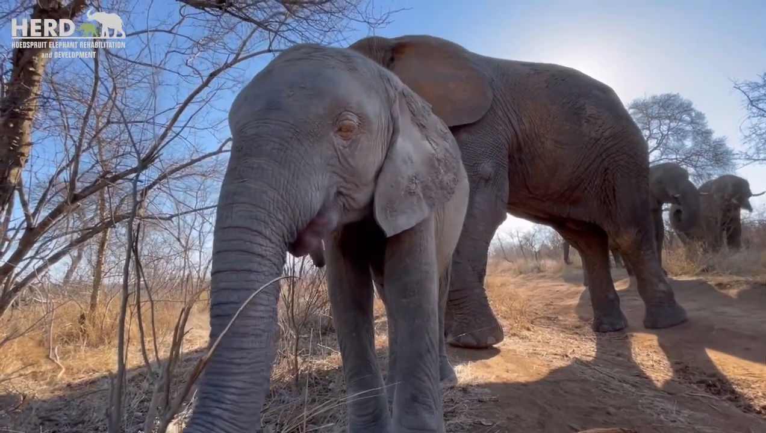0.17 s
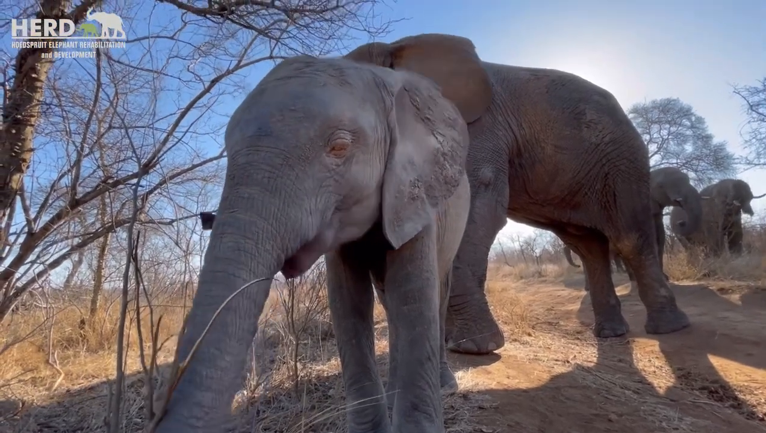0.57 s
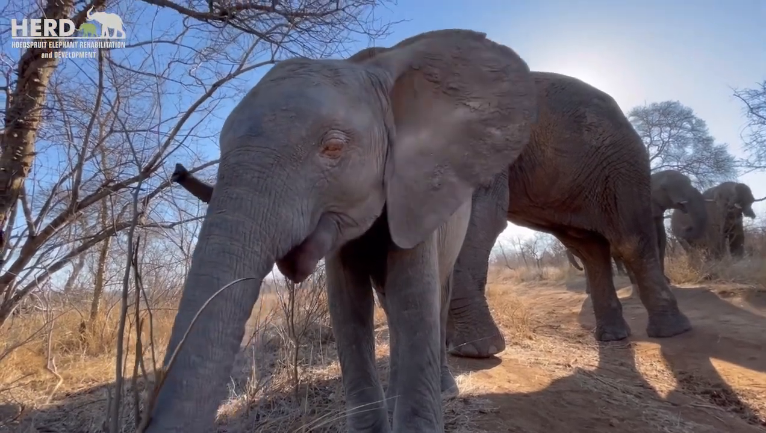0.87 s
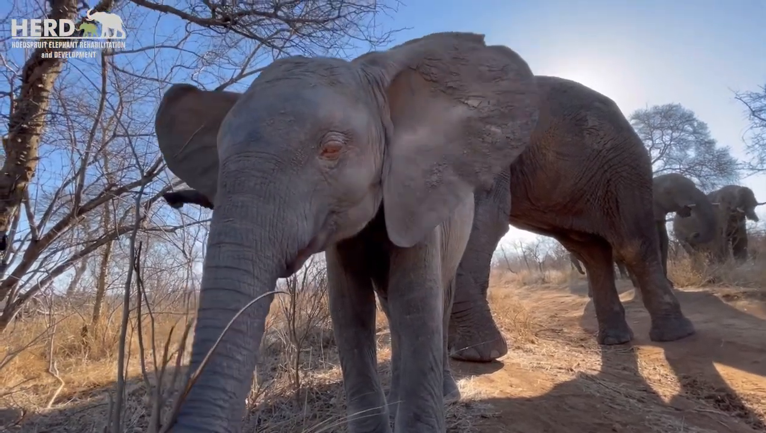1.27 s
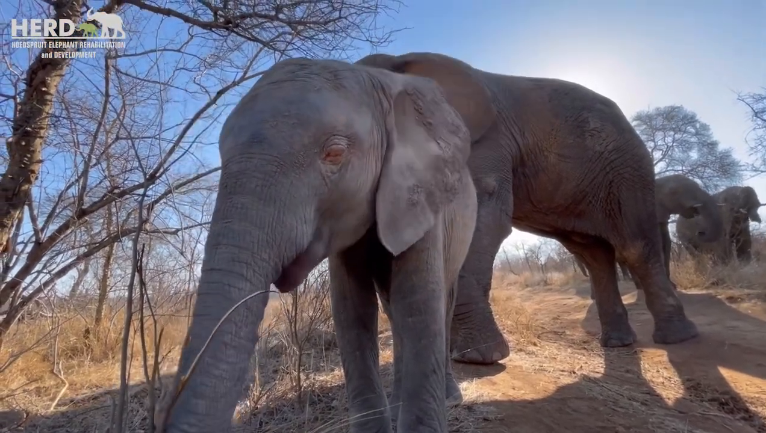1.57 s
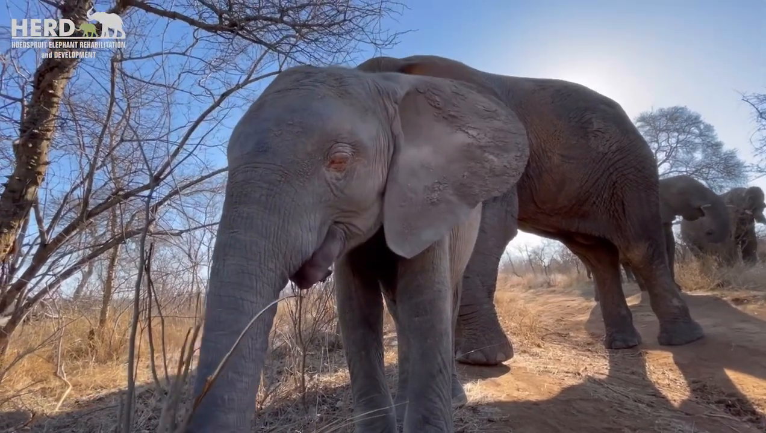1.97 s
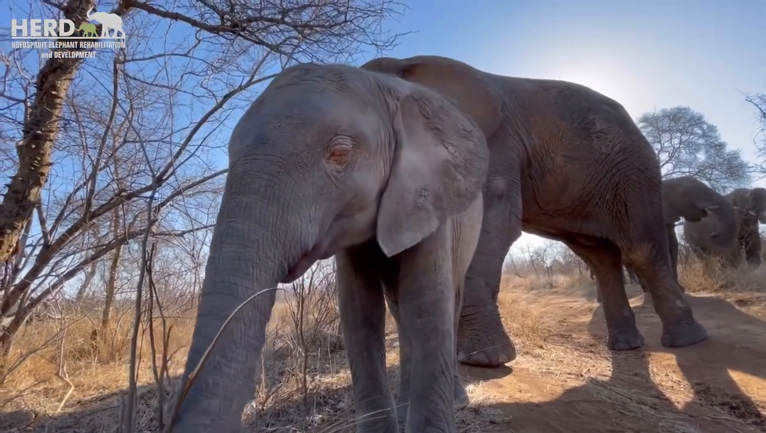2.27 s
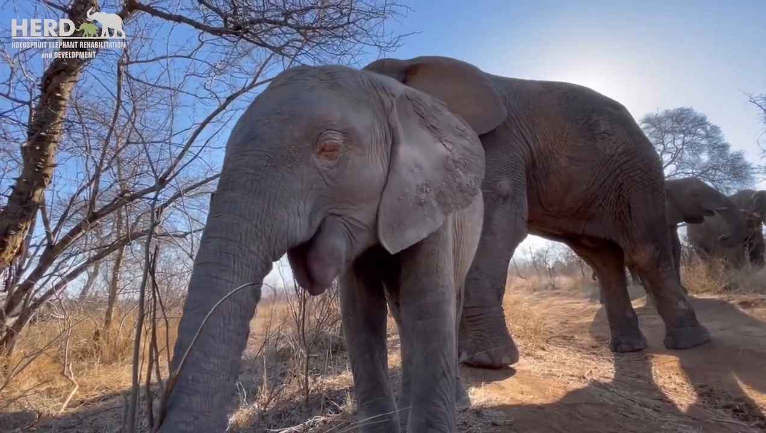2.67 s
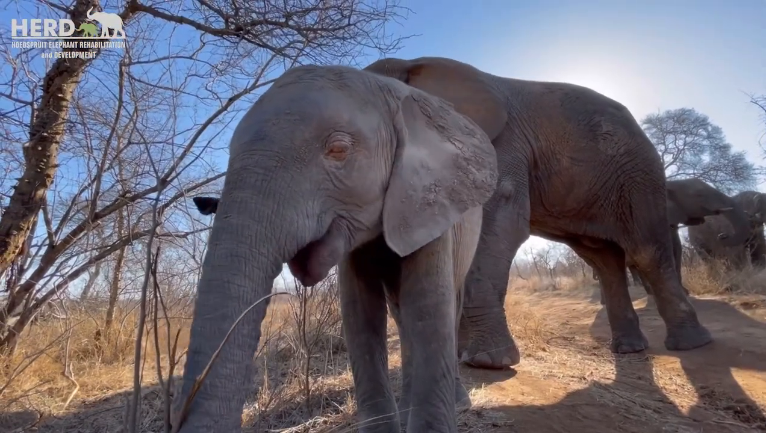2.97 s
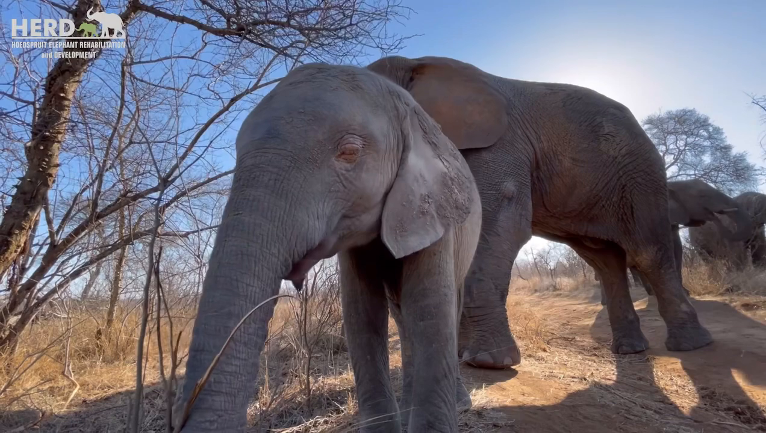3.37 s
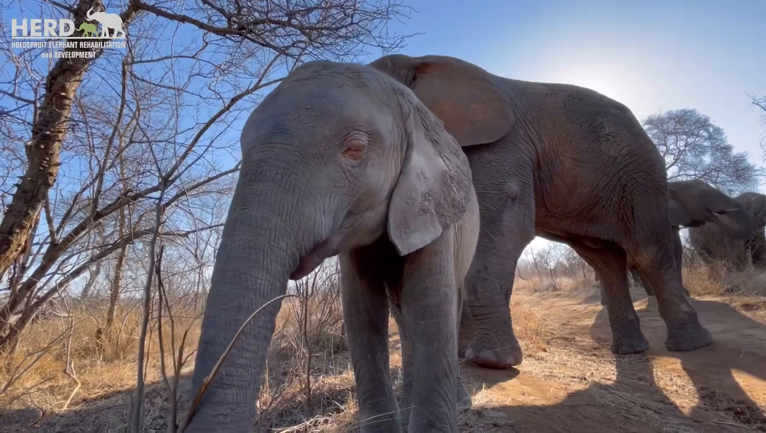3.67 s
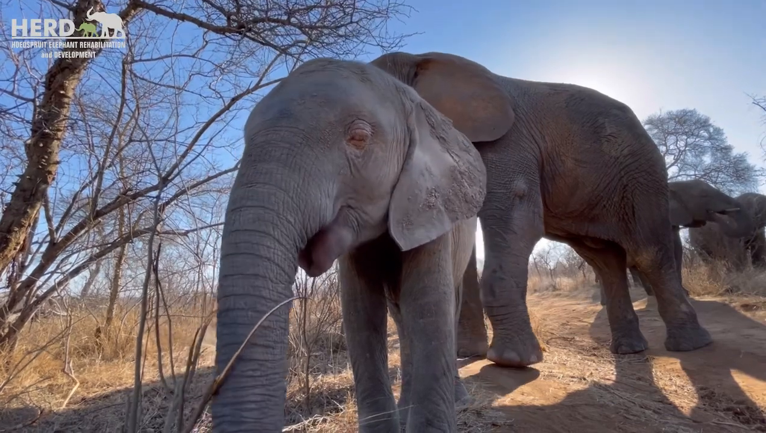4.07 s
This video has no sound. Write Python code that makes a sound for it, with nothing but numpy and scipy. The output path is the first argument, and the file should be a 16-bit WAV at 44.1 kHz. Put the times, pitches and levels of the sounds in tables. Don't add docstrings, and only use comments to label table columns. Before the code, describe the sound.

Close, dry outdoor stereo sound of a young elephant in brittle bush. At the start there are dull wooden scrapes, a soft low thud and hissing grass, with twigs snapping until about 0.75 s. From 0.35 to 1.6 s a quiet, very deep rumble throbs about twenty times a second, slightly left, its faint mouth ring closing into a muffled nasal hum. Light rustling and a few ticks fill the gap, with soft thuds around 1.4 to 1.75 s. At 1.85 to 2.0 s grass swishes hard with a loud sharp crack. A much louder hoarse roar bursts in at 2.15 s, breathy and ragged, then clearer and rattling in rapid pulses, sagging in pitch until about 3.15 s; a low chest hum lingers briefly. After a thud near 3.2 s, dense crackles, snaps and bright clicks run from 3.5 to 3.95 s, with low wind buffets, then thin out.

```python
import sys
import numpy as np
from scipy import signal
from scipy.fft import rfft, irfft, next_fast_len
from scipy.io import wavfile
from scipy.ndimage import uniform_filter1d

SR = 44100
rng = np.random.default_rng(int(sys.argv[2]) if len(sys.argv) > 2 else 0)


def output_pcm(signal):
    pcm = np.clip(np.atleast_2d(signal).T, -1, 1) * 32767
    wavfile.write(sys.argv[1], SR, np.round(pcm).astype(np.int16))


def amplitude_ratio(level_db):
    exponent = np.asarray(level_db, float) / 20
    return 10 ** exponent


N = 185264

# (frequency [Hz], level [dB])
GRASS_COLOUR = [(250, -14), (1200, -3.5), (2000, -0.5), (2800, -1.5), (4900, 0), (5600, -0.5), (6300, 2),
                (7000, 0.5), (7500, -7), (8300, 1.5), (9700, -4), (11000, -3.5), (12500, -12),
                (14800, -3.5)]


def evened(x):
    return x / np.sqrt(np.mean(abs(x) ** 2) + 1e-20)


def read(points, hz, size=1):
    rows = np.transpose(points)
    return np.interp(np.log(hz + 1), np.log(rows[0] + 1), rows[size])


def curves(rows, t):
    s, *columns = np.transpose(rows)
    return [np.interp(t, s, c) for c in columns]


def add(mix, s, sound):
    part = mix[..., round(s * SR):][..., :sound.shape[-1]]
    part += sound[..., :part.shape[-1]]


def butter_pass(x, order, hz, kind="low"):
    return signal.lfilter(*signal.butter(order, hz, kind, fs=SR), x)


def slow_noise(size):
    return evened(uniform_filter1d(rng.standard_normal(N), size=size))


def resonate(x, hz, width):
    turn = np.exp(2j * np.pi * np.cumsum(hz * np.ones(len(x))) / SR)
    r = np.exp(-np.pi * width / SR)
    return 2 * (turn * signal.lfilter([1 - r], [1, -r], x / turn + 1e-18)).real


def two_cavities(x, hz, width, next_hz, next_width):
    return resonate(resonate(x, hz, width), next_hz, next_width)


def folds(rate, snap_s):
    turns = np.cumsum(curves(rate, np.arange(N) / SR)[0]) / SR
    return turns - turns[round(snap_s * SR)]


def closures(turns, wobble_db):
    return (np.diff(np.floor(turns), prepend=0) == 1) * amplitude_ratio(wobble_db * rng.standard_normal(N))


def partials(turns, orders, lag, bend):
    return sum((-1) ** (k == 4) * amplitude_ratio(db) * np.cos(2 * np.pi * (k * (turns - lag) + bend))
               for k, db in orders)


def swells(rows, t):
    powers = []
    for s, db, rise, fall, *_ in rows:
        climb = (s - t) / (abs(rise) + 0.0097)
        drop = (t - s) / (abs(fall) + 0.0027)
        powers.append(amplitude_ratio(2 * db - 20 * np.maximum(climb, drop)))
    return np.array(powers)


def over(bed_db, rows, t):
    return 10 * np.log10(amplitude_ratio(2 * bed_db) + swells(rows, t).sum(axis=0))


def ports(pair, gain=1, focus=0):
    # (frequency [Hz], likeness [0-1], left leads by [rad], left over right [dB])
    port_table = [(60, .95, 0, 1.5), (300, .85, .1, 1), (700, .5, .5, 3), (1400, .55, 1.2, 2),
                  (2300, .88, 3.1, -2), (3500, .65, 5.3, 1), (5300, .6, 8.8, 2.5), (5800, .4, 10.5, 1),
                  (6700, .7, 11.5, 1), (7500, .4, 14.5, 0), (8500, .5, 13.4, -1.5), (10700, .92, 15.7, -1),
                  (11600, .6, 14.6, 0), (12100, .94, 12.6, 0)]
    hz, t, (a, b) = signal.stft(pair, SR, nperseg=256, noverlap=192)
    same, lead, tilt_db = (read(port_table, hz, size=k)[:, None] for k in (1, 2, 3))
    same = np.clip(same + focus * (1 - same), 0, 1)
    left = a * amplitude_ratio(tilt_db / 2)
    right = (same * a + np.sqrt(1 - same ** 2) * b) * np.exp(-1j * lead) / amplitude_ratio(tilt_db / 2)
    z = np.array([left, right]) * (gain(hz[:, None], t) if callable(gain) else gain)
    return signal.istft(z, SR, nperseg=256, noverlap=192)[1][:, :N]


def shaped(colour, same):
    size = next_fast_len(N)
    a, b = rfft(rng.standard_normal((2, size)))
    z = np.array([a, same * a + np.sqrt(max(1 - same ** 2, 0)) * b])
    return evened(irfft(z * amplitude_ratio(read(colour, np.fft.rfftfreq(size, 1 / SR))), size)[:, :N])


def rumble():
    # (time [s], rate [Hz])
    fold_rate = [(.35, 20.0), (.75, 20.0), (.85, 19.6), (1.1, 19.6), (1.3, 19.2), (1.56, 18.9)]
    # (time [s], effort [dB], mouth opening [0-1])
    effort = [
        (.33, -48, 0.9),
        (.4, -47, 0.95),
        (.58, -45, 1),
        (.66, -41.5, 0.58),
        (.75, -43.5, 0.01),
        (1.2, -43, 0.39),
        (1.48, -45.5, 0.45),
        (1.54, -51, 0.07),
        (1.6, -75, 0.3),
    ]
    # (multiple, level [dB])
    orders = [(1, -36), (2, 6.5), (3, -3), (4, -3.5), (5, -13), (6, -3.5), (7, -22), (8, -2), (9, -30),
              (10, -7), (11, -34), (12, -8), (13, -27), (14, -15)]
    t, turns = np.arange(N) / SR, folds(fold_rate, .4015)
    deep_db, gape = curves(effort, t)
    chest_db = deep_db - 1 + 2 * gape
    throat_db = deep_db - 3 - 4.5 * gape
    odd_db = 2 + 16.5 * gape
    mouth_db = -89 + 31 * np.clip(gape / 0.37, 0, 1)
    mouth_hz = np.interp(t, [.4, .68, 1.02, 1.25, 1.5], [960, 960, 910, 994, 977])
    mouth_hz = mouth_hz * (0.982 + 0.14 * (turns % 1))

    deep, chest = (evened(partials(turns, k, .13, -.14)) for k in (orders[1:2], orders[2:4]))
    odd, even = (partials(turns, k, .115, .16) for k in (orders[4::2], orders[5::2]))
    throat = (even + amplitude_ratio(odd_db) * odd) / np.std(even)

    beat = closures(turns, 1.6) + 0.24 * closures(turns - .2, 7.2)
    beat = beat + 0.0078 * rng.standard_normal(N)
    beat = beat + np.exp(-((t - 0.65) / 0.045) ** 2) * closures(turns - .52, 3.2)
    ring = evened(two_cavities(beat, mouth_hz, 75, mouth_hz, 260))
    ring += 0.29 * evened(two_cavities(beat, 725, 150, 750, 200))
    ring += 0.13 * evened(two_cavities(beat, 1280, 160, 1270, 240))

    whine = evened(two_cavities(rng.standard_normal(N), 1145, 30, 1145, 60))
    whine = whine * amplitude_ratio(-67.5 - 7.6 * ((t - .95) / 0.21) ** 4)
    nose_hz = 435 - 60 * (t - .6)
    breath = 0.026 * rng.standard_normal(N) + beat + np.roll(beat, round(0.018 * SR))
    nose = evened(two_cavities(breath, nose_hz, 100, nose_hz, 125))
    nose += 0.53 * evened(two_cavities(beat + closures(turns - .5, 2.0), 317, 90, 320, 120))
    nose = butter_pass(nose, 4, 490)

    voice = whine + amplitude_ratio(deep_db) * deep + amplitude_ratio(chest_db) * chest
    voice = voice + amplitude_ratio(throat_db) * (throat + amplitude_ratio(-12.5) * nose) + amplitude_ratio(mouth_db) * ring
    return voice * np.clip(np.minimum(t - effort[0][0], effort[-1][0] - t) / 0.045, 0, 1)


def roar():
    # (time [s], rate [Hz])
    fold_rate = [(2.2, 31.5), (2.28, 30.27), (2.45, 30.26), (2.6, 29.28), (2.75, 28.35), (2.9, 28.41),
                 (3.05, 27.27), (3.2, 23.37)]
    # (time [s], effort [dB], mouth resonance [Hz], hoarse share [0-1])
    effort = [
        (2.154, -36, 960, 1.1),
        (2.21, -34.5, 1153, 1.24),
        (2.33, -35, 975, 0.96),
        (2.41, -33, 914, 0.63),
        (2.6, -34.5, 870, 0.53),
        (2.85, -36.5, 856, 0.52),
        (2.93, -33.5, 945, 0.43),
        (3.04, -37.5, 900, 0.48),
        (3.137, -35, 972, 0.62),
    ]
    # (time [s], peak [dB], frequency [Hz], t60 [s])
    coughs = [(2.1533, -17.5, 1050, 0.015), (2.156, -15.5, 917, 0.034), (2.165, -18, 1070, 0.058),
              (2.247, -26, 1020, 0.006), (2.249, -26, 1140, 0.022), (2.259, -31, 1033, 0.069),
              (2.292, -14, 1150, 0.013), (2.322, -14.5, 1450, 0.01)]
    t, turns = np.arange(N) / SR, folds(fold_rate, 2.376)
    effort_db, mouth_hz, hoarse = curves(effort, t)
    start, end = effort[0][0], effort[-1][0]
    burst = np.exp(-((t - 2.168) / 0.039) ** 2)
    spent = np.maximum(t - end, 0) / 0.07
    mouth_hz = mouth_hz * (1 + 0.079 * hoarse ** 3 * slow_noise(500))
    hoarse, cycle = np.clip(hoarse + .5 * spent, 0, 1), turns % 1
    throat_db = -2 - 8.5 * hoarse + 1.5 * burst
    attack_db = -30 * np.clip((start - t) / 0.0025, 0, 10)
    effort_db = effort_db + 8 * burst - 30 * np.minimum(spent, 2) ** 3 + attack_db

    beat = closures(turns, 1.1) * (turns > -1.5)
    rattle = .45 * closures(turns - .31, 2.5) + .2 * closures(turns - .56, 3.5)
    rattle = butter_pass(rattle, 3, 1700)
    clumps = amplitude_ratio(2.6 * slow_noise(150))
    airflow = np.clip(1 - 0.68 * (1 - hoarse ** 2) * np.exp(-(cycle / 0.2) ** 2), .1, 1)
    puffs = airflow * clumps * rng.standard_normal(N)
    clear = 0.8 * evened(beat + 0.16 * closures(turns - .31, 4.2))
    drive = np.sqrt(1 - hoarse ** 2) * clear + hoarse * evened(puffs)
    soft = butter_pass(drive, 4, 1150)

    mouth = resonate(soft, mouth_hz, 88) + 0.37 * hoarse * resonate(soft, 0.75 * mouth_hz, 330)
    mouth = resonate(mouth, mouth_hz, 720)
    upper_hz = mouth_hz * (1.22 + 0.2 * cycle)
    upper = two_cavities(3.1 * evened(puffs) + evened(rattle), upper_hz, 500, upper_hz, 1400)
    throat = two_cavities(soft, 442, 150, 398, 213) + 0.84 * two_cavities(soft, 643, 300, 514, 480)
    edge = two_cavities(puffs, 1800, 260, 2230, 220)
    hiss = resonate(puffs + 0.8 * rng.standard_normal(N), 8000, 990)
    hiss = signal.sosfilt(signal.butter(6, [7850, 9300], "band", fs=SR, output="sos"), hiss)
    voice = evened(mouth) + amplitude_ratio(-8.5) * evened(upper) + amplitude_ratio(throat_db) * evened(throat)
    voice = voice + amplitude_ratio(-27.0) * evened(edge) + amplitude_ratio(-25.5) * evened(hiss)
    voice *= amplitude_ratio(effort_db - 2.0)

    ring = np.arange(2000) / SR
    for s, db, hz, t60 in coughs:
        decay = amplitude_ratio(db - 60 * ring / t60) * (1 - np.exp(-ring / 0.00035))
        add(voice, s, decay * 0.73 * np.sin(2 * np.pi * hz * ring))
    return voice + chest_hum(t, turns, spent)


def chest_hum(t, turns, spent):
    # (time [s], rate [Hz])
    hum_rate = [(2.2, 33.5), (2.35, 32.5), (2.47, 30.2), (2.6, 29.28), (2.75, 28.35), (2.9, 28.41),
                (3.05, 27.27), (3.3, 26.5)]
    # (multiple, level [dB])
    orders = [(1, -19), (2, 3), (3, -7.5), (4, 1.5), (5, -6), (6, -29.5), (7, -15)]
    start_s, end_s, swell_s, lock_s = 2.204, 3.36, 0.19, 2.7
    hum_turns = folds(hum_rate, lock_s) + turns[round(lock_s * SR)]
    chest = partials(hum_turns, orders[1:], 0, .06)
    span = np.clip(np.minimum(t - start_s, end_s - t) / 0.041, 0, 1)
    since = (t - start_s) / swell_s
    sag_db = 4.5 * swell_s * (since - 1)
    hum_db = np.minimum(-55 + 8.5 * since, -46.5 - sag_db)
    return amplitude_ratio(hum_db - 5 * np.minimum(spent, 1)) * evened(chest) * span


def scrub(x):
    t = np.arange(round(.3 * SR)) / SR
    sparse = rng.standard_normal((2, len(t))) * (rng.random((2, len(t))) < .05)
    taps = sparse * amplitude_ratio(-60 * t / 0.44) * (t > .006)
    return signal.fftconvolve(x[None], taps / np.linalg.norm(taps[0]), axes=1)[:, :N]


def rustle():
    # (peak time [s], level [dB], rise by 10 dB [s], fall by 10 dB [s], brightness [dB])
    strokes = [(.001, -54.5, .1, -0.3, -1.5), (.08, -62, 3, 0.2, -1), (.2, -61.5, -4, 0.15, 7),
               (.31, -54, -0.06, 0.2, 0.5), (.4, -54.5, 0.16, 0.11, 1), (.49, -58.5, -0.2, 0.25, 0),
               (.6, -59.5, -0.5, 0.25, -6), (.73, -54, 0.33, 0.12, 1.5), (.94, -58.5, .05, 0.16, 5),
               (1.3, -61, 0.6, -0.3, 2), (1.47, -53, 0.07, 0.25, 1), (1.68, -61.5, 0.7, .06, -1.5),
               (1.82, -56.5, 0.25, .05, 1), (1.885, -43.5, 0.027, 0.06, 1.5),
               (1.938, -38, 0.0248, 0.02, 4.5), (1.996, -42.5, .04, 0.0463, -2.5), (2.05, -60, -0.4, 1, 1),
               (2.19, -48, 0.08, 0.32, -5.5), (2.255, -43.5, 0.01, 0.09, -7.5),
               (2.41, -46.5, 0.07, 0.08, -2), (2.445, -49.5, 0.01, 0.05, -13), (2.51, -59, -0.1, 0.2, 0),
               (2.678, -57.5, -0.4, 0.24, 1), (2.79, -62, -0.2, 0.3, 1), (2.93, -61, .08, 0.4, 0),
               (3.09, -60.5, -0.2, 0.29, 2), (3.245, -49.5, -0.02, 0.17, -4), (3.31, -54, 0.08, -0.03, -2),
               (3.4, -65.5, 0.5, -0.07, 0), (3.48, -51.5, -0.03, 0.1, 0.5), (3.53, -47.5, -0.01, 0.08, 0),
               (3.575, -43.5, -0.0141, 0.1, -3), (3.64, -45.5, -0.0056, 0.1, 3),
               (3.72, -43.5, 0.01, 0.08, -5), (3.76, -40, 0.02, 0.1, 1.5), (3.81, -44.5, 0.01, 0.07, -8),
               (3.85, -43.5, -0.01, 0.02, 6), (3.9, -52.5, 0.02, .06, 6), (3.955, -48.5, 0.03, 0.05, 3),
               (4.01, -54, .04, -0.02, -1), (4.12, -59, -2.1, 0.2, -0.5)]
    # (peak time [s], level [dB], rise [s], fall [s])
    snort = [(2.158, -47.5, 0.0026, 0.26)]
    size = amplitude_ratio(5.0 * np.minimum(rng.exponential(1, N), 5)) * (rng.random(N) < 350 / SR)
    crackle = signal.lfilter([1], [1, -np.exp(-1 / (0.0036 * SR))], size)
    flicker = amplitude_ratio(1.1 * slow_noise(900))
    grains = (1 + .5 * evened(crackle)) * flicker * rng.standard_normal((2, N))

    def gain(hz, t):
        body_db = over(-70.5, strokes, t)
        bright_db = np.array(strokes)[:, -1] @ swells(strokes, t) / amplitude_ratio(2 * body_db)
        upper_db = -7 - 0.13 * (body_db + 54) + bright_db
        upper_db = over(body_db + upper_db, snort, t) - body_db
        top_db = -6 + bright_db
        upper, top = np.clip((hz - 7200) / 500, 0, 1), np.clip((hz - 10200) / 1500, 0, 1)
        patches = uniform_filter1d(rng.standard_normal((len(hz), len(t))), size=6, axis=0)
        patches = evened(uniform_filter1d(patches, size=40, axis=1))
        bands_db = (upper - top) * (upper_db + 6.5) + top * (top_db + 5.0)
        return amplitude_ratio(read(GRASS_COLOUR, hz) + body_db + bands_db + 2.26 * patches + 7.5)
    return ports(evened(grains), gain, focus=0.011)


def snaps():
    # (time [s], peak [dB], centre [Hz], t60 [s])
    twig_snaps = [(.2568, -21.5, 6550, 0.0094), (.394, -29, 7950, 0.085), (.4599, -40, 6560, 0.071),
                  (.4826, -34, 6160, .025), (.587, -23.5, 14300, 0.022), (.605, -26.5, 6500, 0.015),
                  (.7027, -30, 8460, 0.016), (.743, -33, 15000, 0.038), (1.4228, -32.5, 5600, 0.035),
                  (1.4618, -27, 13200, 0.083), (1.8452, -28.5, 8800, 0.036), (1.8628, -30.5, 5200, .09),
                  (1.8839, -25, 5400, .08), (1.9162, -8.5, 5660, 0.0086), (1.8895, -27, 4700, .03),
                  (1.897, -35, 8500, .02), (1.924, -22, 7000, 0.022), (1.932, -25, 8700, 0.017),
                  (1.9415, -21.5, 5000, .03), (1.9744, -26.5, 5000, 0.034), (1.9958, -21.5, 8800, .03),
                  (2.008, -29, 5000, .03), (1.9921, -15, 5200, 0.045), (2.1081, -33.5, 4500, 0.057),
                  (2.155, -26, 8000, 0.019), (2.34, -33, 3430, 0.035), (2.393, -31, 3150, 0.15),
                  (3.5205, -27.5, 2850, 0.11), (3.5588, -34, 6500, .03), (3.5737, -27.5, 6400, .049),
                  (3.597, -21, 6900, 0.02), (3.6256, -19, 3120, 0.025), (3.714, -37, 4470, 0.027),
                  (3.7221, -27, 4030, 0.022), (3.75, -23.5, 6500, .03), (3.772, -29.5, 6600, .03),
                  (3.7984, -32, 6160, .03), (3.7354, -24.5, 6270, 0.045), (3.8382, -19.5, 6250, 0.016),
                  (3.855, -32, 8700, .02), (3.936, -29.5, 6700, 0.053)]
    # (time [s], peak [dB], centre [Hz])
    more_twig_snaps = [(0.0553, -55, 2620), (.108, -42, 13000), (0.184, -46, 6320), (0.269, -34, 7500),
                       (.3152, -45, 6940), (.757, -35, 14500), (0.9147, -38.5, 9000), (1.263, -47, 6510),
                       (1.291, -45, 6970), (1.684, -41, 6010), (1.8166, -41, 6860), (2.055, -44, 5990),
                       (2.68, -43, 13400), (2.809, -40, 9000), (2.869, -45, 12300), (2.891, -40, 12800),
                       (3.11, -56, 14100), (3.2525, -41, 4400), (3.383, -40.5, 2430), (3.5064, -41, 5170),
                       (.1271, -37.5, 6430), (.218, -36, 6430), (0.3324, -33, 7000), (1.219, -40, 14000),
                       (1.3604, -39, 3480), (1.387, -37, 6850), (1.465, -30, 2680), (1.6342, -41.5, 14600),
                       (2.0358, -38.5, 4900), (2.618, -49, 8710), (2.9143, -41, 8900), (2.9385, -33.5, 4700),
                       (2.9806, -36, 4900), (3.209, -34.5, 2070), (3.2325, -35, 4250), (3.3047, -36, 3260),
                       (3.468, -40, 4080), (4.0761, -39, 15400)]
    out, t, hz = np.zeros((2, N)), np.arange(1500) / SR, np.fft.rfftfreq(1500, 1 / SR)
    twigs = twig_snaps + [(*row, 0.054) for row in more_twig_snaps]
    noises = rng.standard_normal((len(twigs), 2, 1500))
    for (s, db, centre_hz, t60), noise in zip(twigs, noises):
        lean = amplitude_ratio(read(GRASS_COLOUR, hz) - 9.3 * abs(np.log2((hz + 50) / centre_hz)))
        decay = amplitude_ratio(-60 * t / max(t60, .004)) + 1.2 * np.exp(-t / 0.0012)
        decay = decay * (1 - np.exp(-t / 0.0007))
        add(out, s, evened(irfft(rfft(noise) * lean)) * amplitude_ratio(db - 8) * decay)
    return ports(out, focus=0.015)


def ticks():
    # (time [s], peak [dB])
    clicks = [(0.2548, -36), (0.4825, -29), (0.5856, -32), (0.734, -27), (1.2186, -36), (1.3948, -34),
              (1.4217, -36), (1.4601, -22), (1.8642, -38), (1.916, -20), (1.992, -16.5), (2.4129, -25),
              (2.9135, -34), (2.9382, -28.5), (2.9801, -34), (3.5348, -20.5), (3.5598, -46), (3.573, -19),
              (3.5967, -17), (3.6257, -17), (3.8382, -13.5), (4.0761, -44.5)]
    out, t = np.zeros(N), np.arange(200) / SR
    for (s, db), noise in zip(clicks, rng.standard_normal((len(clicks), 200))):
        add(out, s, amplitude_ratio(db - 1.5) * noise * np.exp(-t / 0.00039))
    out = butter_pass(out, 3, 9500, "high")
    return ports(np.array([out, out]), focus=0.23)


def knocks():
    # (time [s], level [dB], t60 [s])
    scrapes = [
        (0.0, -36.5, 0.02),
        (.068, -35, 0.046),
        (0.076, -33, 0.071),
    ]
    out, t = np.zeros(N), np.arange(3000) / SR
    hollows = [(750, 1070, 1.06), (1850, 440, 0.75), (2180, 190, 0.62)]  # (Hz, width Hz, share)
    for (s, db, t60), noise in zip(scrapes, rng.standard_normal((len(scrapes), 3000))):
        wood = sum(g * evened(two_cavities(noise, hz, w, hz, w)) for hz, w, g in hollows)
        add(out, s, evened(wood) * amplitude_ratio(db - 60 * t / t60) * (1 - np.exp(-t / 0.0016)))
    return out


def thuds():
    # (time [s], peak [dB], frequency [Hz], t60 [s])
    pushes = [(0.001, -31.5, 148, 0.075), (0.076, -20, 137, 0.084), (0.36, -38, 261, 0.091),
              (0.256, -28.5, 307, 0.033), (1.404, -30, 174, 0.15), (1.545, -30, 159, 0.13),
              (1.755, -24, 112, 0.098), (3.192, -26.5, 117, 0.078), (3.881, -30, 135, 0.073),
              (4.035, -32.5, 102, 0.07)]
    out, t = np.zeros(N), np.arange(8000) / SR
    for s, db, hz, t60 in pushes:
        swell = 1 - np.exp(-t / 0.0055)
        add(out, s, amplitude_ratio(db - 3.5 - 60 * t / t60) * swell * np.sin(2 * np.pi * hz * t))
    return out


def wind():
    # (peak time [s], level [dB], rise by 10 dB [s], fall by 10 dB [s])
    gusts = [(.078, -51, .3, 0.24), (1.4, -54, 2, -1), (1.75, -52, 0.9, -0.1), (2.6, -64, -1, 2),
             (3.2, -53.5, 0.2, -0.6), (3.63, -55, 0, 0.2), (3.86, -55, .1, 0.3), (3.93, -48, 0.13, -0.06),
             (4.02, -56, 0.14, 0.2), (4.17, -56, 0.3, 0.5)]
    buffets = [(1.95, -63, 0.092, .1), (3.5, -67, .06, .06), (3.84, -50.5, 0.062, 0.11),
               (3.92, -52, .07, .1), (4.01, -53, .06, .06)]
    wash_swells = [(.001, -57, .1, 0.053), (.1, -51, 0.027, 0.04), (.5, -59, .3, 0.57),
                   (1.7, -57, 0.58, 0.25), (2.3, -57, 0.23, 1), (3.77, -53, 0.19, 0.22)]
    # (frequency [Hz], level [dB])
    gust_colour = [(15, -53), (25, -32), (46, -1), (75, -5.5), (113, 0), (139, -3), (178, -6), (400, -33.5),
                   (520, -59), (880, -120)]
    buffet_colour = [(15, -40), (30, -10), (55, 0), (80, -3), (130, -42), (300, -100)]
    wash_colour = [(120, -33), (200, -2), (473, -2.5), (524, -4.5), (923, -7), (2090, -21), (3000, -16.5),
                   (3900, -77), (6600, -120)]
    t = np.arange(N) / SR
    lumps = amplitude_ratio(2.2 * slow_noise(2500))
    gusty = amplitude_ratio(over(-61, gusts, t) + 1.5) * lumps * shaped(gust_colour, 0.95)
    deep = amplitude_ratio(over(-80, buffets, t)) * shaped(buffet_colour, 0.96)
    wash = amplitude_ratio(over(-68, wash_swells, t) + 2.5) * shaped(wash_colour, 0.25)
    return gusty + deep + wash


def scene():
    low, loud = rumble(), roar()
    thin = butter_pass(low + loud, 2, 280, "high")
    turned = (signal.hilbert(low, next_fast_len(N))[:N] * np.exp(1j * np.c_[[.15, -.15]])).real
    voices = turned * amplitude_ratio(np.c_[[.7, -.7]]) + loud
    voices = voices + np.c_[[-.15, .15]] * butter_pass(loud, 2, 450, "high")
    bush = rustle() + snaps() + ticks() + knocks() + thuds() + wind()
    return voices + amplitude_ratio(-18) * scrub(thin) + bush


def band_limit(x):
    return signal.sosfilt(signal.butter(12, 16670, fs=SR, output="sos"), x)


def record(dry):
    cut = signal.sosfiltfilt(signal.butter(3, 27, "high", fs=SR, output="sos"), dry)
    treble_cut = signal.firwin(511, 15850, window=("kaiser", 6), fs=SR)
    mix = signal.oaconvolve(cut, treble_cut[None], "same")
    return band_limit(mix)


dry = scene()
out = record(dry)
output_pcm(out)
```